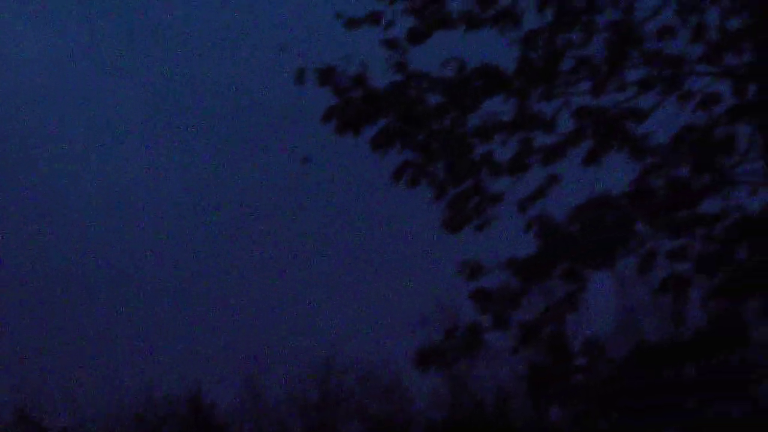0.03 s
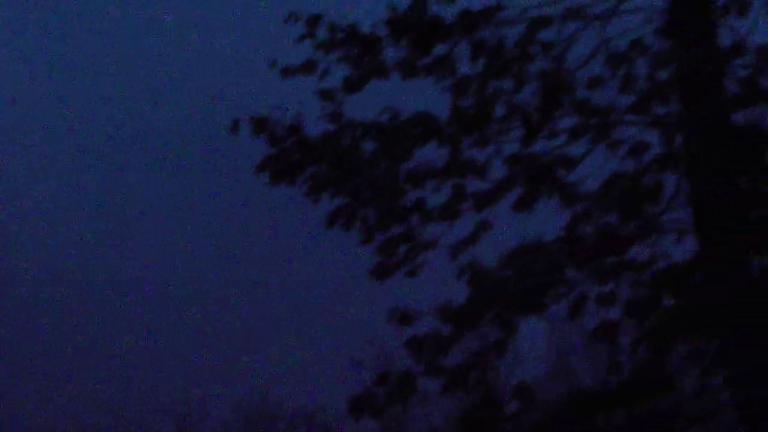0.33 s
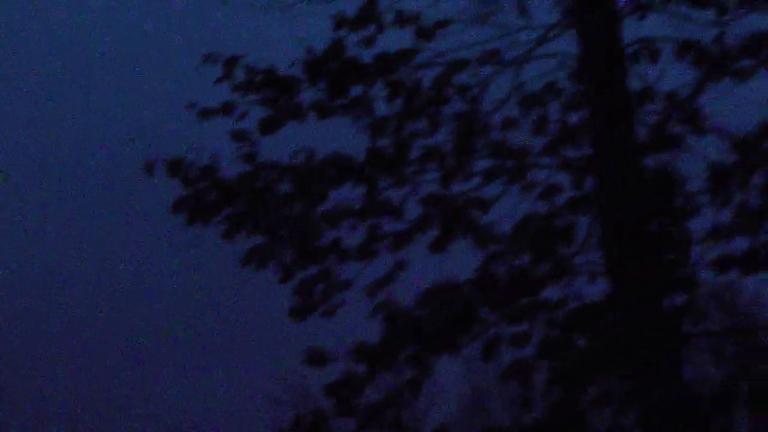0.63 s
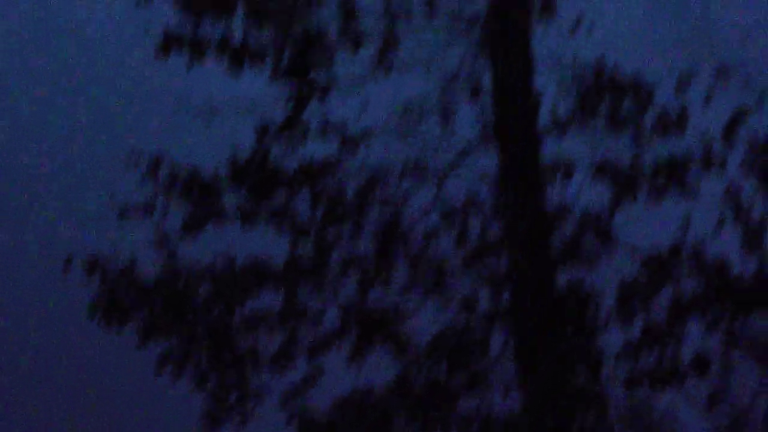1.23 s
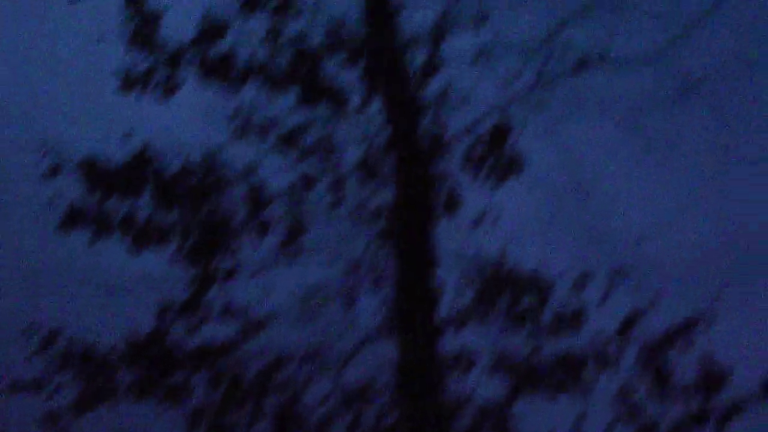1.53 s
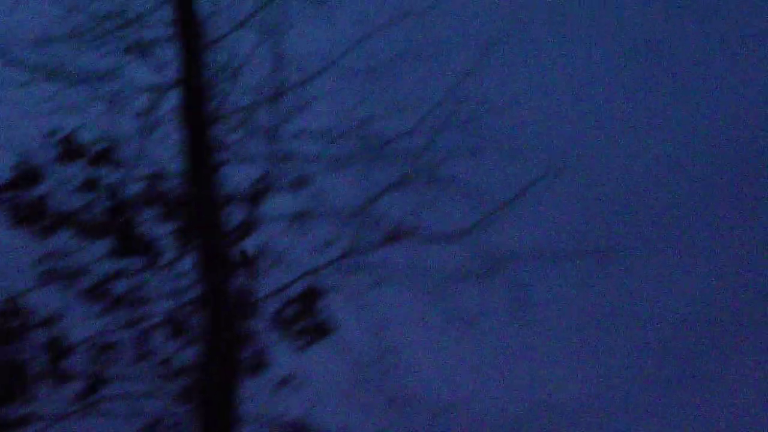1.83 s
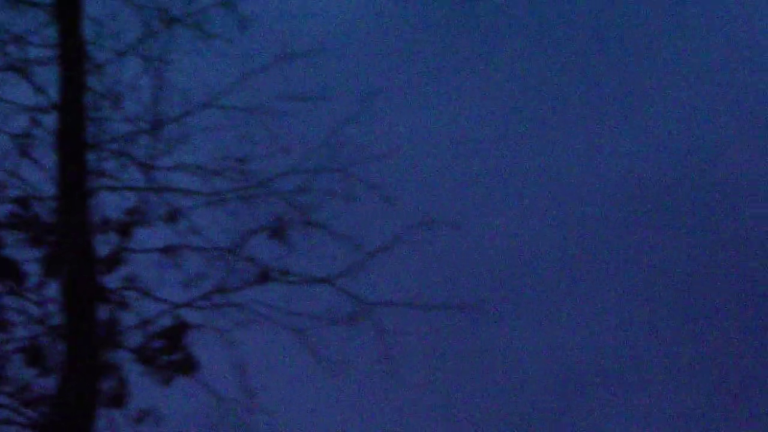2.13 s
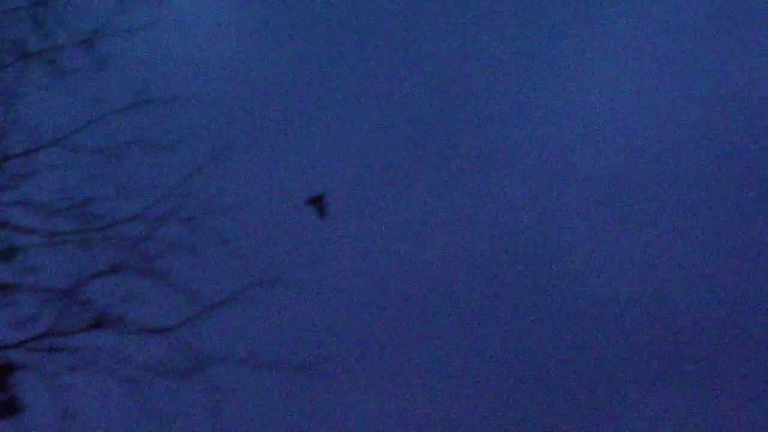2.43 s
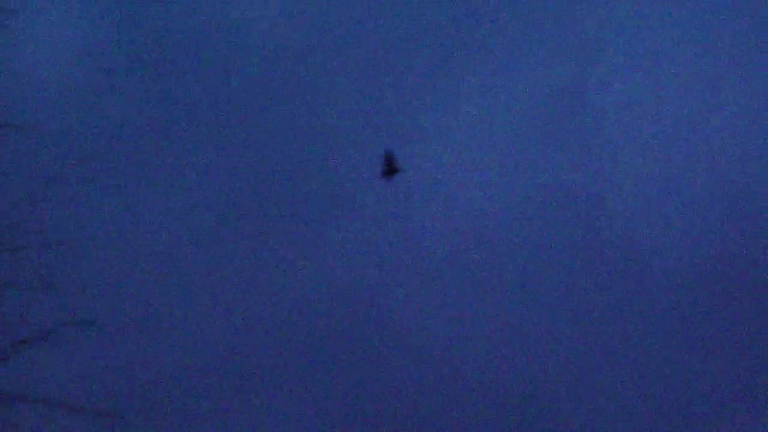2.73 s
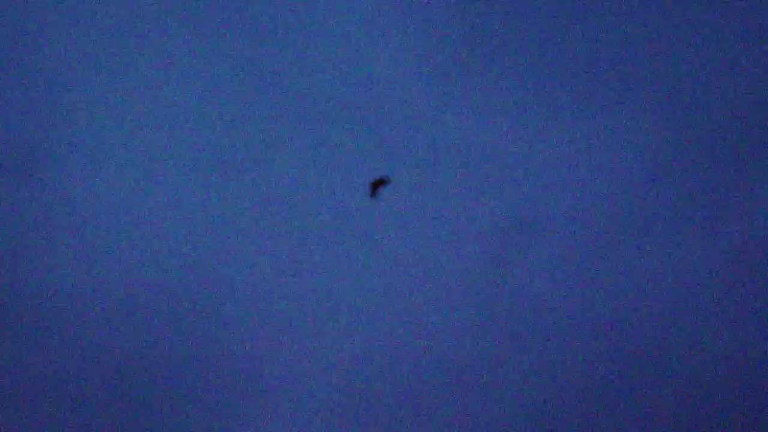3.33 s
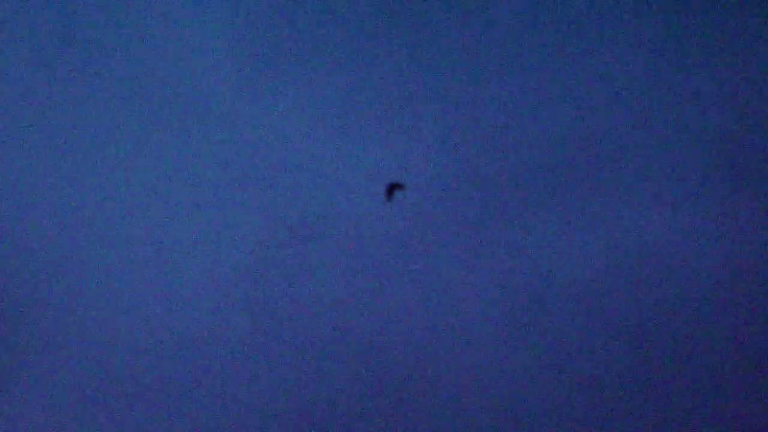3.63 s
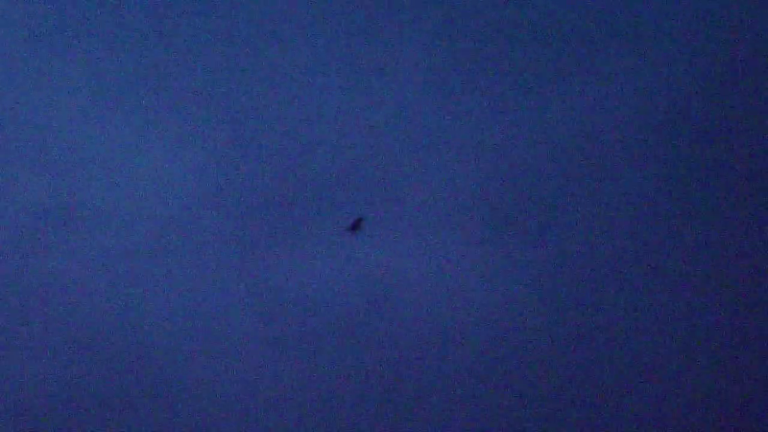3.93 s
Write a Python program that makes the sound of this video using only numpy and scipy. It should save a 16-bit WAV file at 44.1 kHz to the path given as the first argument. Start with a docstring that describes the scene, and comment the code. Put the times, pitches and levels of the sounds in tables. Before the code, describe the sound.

A flying bird gives one thin, high squeak that ends in a snap, a little before halfway. Light wind buffets the hand-held microphone outdoors, with faint hiss, rubbing at first, then soft thumps, knocks and a few clicks.

```python
"""Dusk: light wind buffets the microphone of a hand-held camera, which hisses and whines faintly throughout.
The hand scuffs and rubs on the casing, faint whistles sound far off, and soft knocks and thumps begin.
A woodcock flies over with one thin arched squeak, two voices of its syrinx at once, ending in a snap
and a faint low note that echo in the trees. More knocks and thumps follow, with one more far whistle
and sharp clicks of the casing, and last a brief brush of cloth."""
import sys
import numpy as np
from scipy import signal
from scipy.fft import rfft, irfft, next_fast_len
from scipy.io import wavfile
from scipy.ndimage import map_coordinates

SR = 44100
rng = np.random.default_rng(int(sys.argv[2]) if len(sys.argv) > 2 else 0)


def master_out(mix):
    """Clip the mix to full scale and print it as 16-bit PCM to the path in sys.argv[1]."""
    frames = np.transpose(np.atleast_2d(mix))
    ceiling = np.clip(frames, -1, 1)
    pcm = np.round(ceiling * 32767).astype(np.int16)
    wavfile.write(sys.argv[1], SR, pcm)


N = 176400

# how the casing colours both the hiss and the rubbing: frequency_hz, gain_db
CASING_COLOUR = [(400, -32), (750, -13), (1000, -13), (1150, -7), (1400, -8), (1600, -3), (1900, -4.5),
                 (2170, -11), (2420, -4.5), (2700, -12), (3100, -6.5), (3520, 0.5), (3850, -1),
                 (4280, -9.5), (4620, -3), (5550, -23.5), (6050, -21.5), (6450, -16.5), (7600, -12),
                 (8900, -14), (9450, -9), (10800, -21.5), (11350, -18), (11900, -24), (12700, -29.5),
                 (15700, -29.5)]


def amp(db):
    """Decibels to gain."""
    return 10 ** (np.asarray(db) / 20)


def unit(x):
    """Scaled to rms 1."""
    return x / np.sqrt(np.mean(x ** 2) + 1e-20)


def clock():
    """The time of each sample in seconds."""
    return np.arange(N) / SR


def along(points, hz):
    """Read a curve of (frequency_hz, value) points on a log frequency axis."""
    frequencies, values = np.transpose(points)
    return np.interp(np.log(hz + 1), np.log(frequencies + 1), values)


def wobble(rate):
    """A smooth random curve, rate knots a second."""
    return map_coordinates(rng.standard_normal(int(N * rate / SR) + 4), [clock() * rate])


def filtered(x, response):
    """Equalise x by a gain that depends on frequency."""
    size = next_fast_len(N + SR // 2)
    return irfft(rfft(x, size) * response(np.fft.rfftfreq(size, 1 / SR)), size)[:N]


def passed(x, kind, hz):
    """A low-pass or high-pass, 24 dB an octave."""
    return signal.lfilter(*signal.butter(4, hz, kind, fs=SR), x)


def banded(x, edges_hz):
    """One band of x, at rms 1."""
    return unit(signal.sosfilt(signal.butter(3, edges_hz, "band", fs=SR, output="sos"), x))


def noise(spectrum):
    """Coloured noise of rms 1."""
    return unit(filtered(rng.standard_normal(N), lambda hz: amp(along(spectrum, hz))))


def tone(hz):
    """A sine of rms 1 that follows a pitch curve."""
    return np.sqrt(2) * np.sin(2 * np.pi * np.cumsum(hz) / SR)


def swells(rows):
    """Bell-shaped fades from rows of (peak_s, width_s, level_db)."""
    return sum(amp(db) * np.exp(-.5 * ((clock() - s) / width) ** 2) for s, width, db in rows)


def struck(blows, modes, rise_s, crack_db, crack_t60_s, crack_hz):
    """Each blow rings the modes and adds a short crack of low-passed noise."""
    out = np.zeros(N)
    t = clock()[:SR // 4]
    attack = 1 - np.exp(-t / rise_s)
    for start_s, db in blows:
        ring = sum(amp(gain - 60 * t / t60) * np.sin(2 * np.pi * hz * t) for hz, gain, t60 in modes)
        grit = unit(passed(rng.standard_normal(len(t)), "low", crack_hz))
        crack = amp(crack_db - 60 * t / crack_t60_s) * grit
        part = out[round(start_s * SR):][:len(t)]
        part += (amp(db) * (ring + crack) * attack)[:len(part)]
    return out


def wind():
    """Lumpy buffeting on the microphone over a low bed of air."""
    # the rise and fall of the wind: time_s, strength_db
    gusts = [(0, -37), (.12, -38), (.3, -45), (.55, -49), (.65, -37.5), (.88, -41), (1.08, -29),
             (1.17, -34.5), (1.5, -30.5), (1.75, -35), (2.55, -30), (2.98, -41), (3.12, -29), (3.42, -32),
             (3.62, -28.5), (4, -33)]
    # colour of the buffeting: frequency_hz, gain_db
    rumble = [(10, -3), (25, 3), (80, -8.5), (150, -18), (300, -30), (600, -43.5), (4000, -100)]
    # colour of still evening air: frequency_hz, gain_db
    air = [(30, -2), (350, -11), (600, -14.5), (3000, -79)]
    strength_db = np.interp(clock(), *np.transpose(gusts))
    lumps = amp(3 * wobble(rate=22))
    buffet = unit(lumps * noise(rumble))
    return amp(strength_db + 1.5) * buffet + amp(-55) * noise(air)


def camera():
    """Steady hiss coloured by the casing, with a thin wavering whine from the drive."""
    # the tones of the drive: pitch_hz, level_db
    drive_tones = [(1298, -63), (2807, -65), (3508, -57), (11364, -69)]
    wander_hz, waver_db = 6.84, 0.55
    whine = sum(amp(db) * tone(hz + wander_hz * wobble(40)) for hz, db in drive_tones)
    hiss = amp(-43 + waver_db * wobble(7.97)) * noise(CASING_COLOUR)
    return hiss + whine


def rubbing():
    """The grip scuffs, the sliding hand stirs the casing's lower resonances, and cloth brushes by."""
    # the grip shifts: peak_s, width_s, level_db
    grip_shifts = [(.005, .02, -44), (.13, 0.049, -50.5), (.63, 0.024, -49), (1.405, 0.017, -48),
                   (1.62, 0.052, -54), (1.79, 0.057, -47.5)]
    # the hand slides on the casing: peak_s, width_s, level_db
    strokes = [(.22, 0.058, -49), (.35, 0.04, -46), (.45, 0.038, -47)]
    # the bright colour of cloth: frequency_hz, gain_db
    cloth = [(3000, -27), (8300, 5), (15000, -16)]
    slips = amp(-wobble(rate=82))
    slide = swells(strokes) * banded(slips * noise(CASING_COLOUR), edges_hz=(1120, 2200))
    scuffs = swells(grip_shifts) * banded(rng.standard_normal(N), edges_hz=(167, 417))
    brush = swells([(3.81, 0.011, -44.5)]) * noise(cloth)
    return scuffs + slide + brush


def far_whistles():
    """Faint rough glides that swell and fade, blurred by distance."""
    # far-off whistles: start_s, length_s, from_hz, to_hz, level_db, pitch_scatter_ratio
    whistles = [(0.872, 0.019, 1160, 1120, -46.5, .04), (0.919, 0.098, 1880, 1230, -51, 0.01),
                (0.942, 0.0396, 3370, 3070, -48, .03), (2.806, 0.079, 1080, 1240, -47.5, 0.09)]
    out = np.zeros(N)
    for start_s, length_s, from_hz, to_hz, db, scatter in whistles:
        progress = np.clip((clock() - start_s) / length_s, 0, 1)
        pitch = (from_hz + (to_hz - from_hz) * progress) * (1 + scatter * wobble(500))
        fade = np.sqrt(np.abs(np.sin(np.pi * progress)))
        flutter = amp(3 * wobble(200))
        out += amp(db) * fade * unit(tone(pitch) * flutter)
    return out


def handling():
    """Knocks, dull thumps and sharp clicks of the casing; a softer finger gives a duller knock."""
    # fingers land on the casing: start_s, strength_db, cutoff_hz
    taps = [(.988, -32.5, 890), (1.775, -23.5, 605), (2.08, -25, 346), (2.832, -21.5, 387),
            (2.974, -27.5, 400), (3.099, -27.5, 2500), (3.1017, -39, 2500), (3.578, -29, 1000)]
    # the ring of a knock: pitch_hz, gain_db, t60_s
    knock_modes = [(345, -9.5, 0.05), (634, -2.5, 0.019), (1025, -4.5, 0.019), (1280, 5.5, 0.021),
                   (1460, 5.5, 0.016)]
    # the camera shifts in the hand: start_s, strength_db
    bumps = [(1.045, -18.5), (1.098, -11.5), (1.888, -15.5), (2.072, -15), (2.325, -17.5), (2.5, -14),
             (2.54, -17), (3.108, -21), (3.688, -26)]
    # the low body of a thump: pitch_hz, gain_db, t60_s
    thump_modes = [(47, 0.5, 0.13), (78, -4.5, 0.11), (144, -8, 0.042), (212, -14.5, 0.02)]
    # the casing clicks: start_s, strength_db
    ticks = [(2.28, -26), (3.1068, -21.5), (3.1097, -14)]
    # the bright ring of a click: pitch_hz, gain_db, t60_s
    click_modes = [(2429.5, -10, 0.014), (3550, 13, 0.0038), (4100, -3, 0.004), (5650, -9, .005),
                   (8900, -5, 0.0033)]
    clicks = struck(ticks, click_modes, rise_s=0.00076, crack_db=-5, crack_t60_s=0.0084, crack_hz=5370)
    knocks = np.zeros(N)
    for start_s, db, cutoff_hz in taps:
        knock = struck([(start_s, db)], knock_modes,
                       rise_s=0.00075, crack_db=-8, crack_t60_s=0.014, crack_hz=2500)
        knocks += passed(knock, "low", cutoff_hz)
    thumps = struck(bumps, thump_modes, rise_s=0.0047, crack_db=-17, crack_t60_s=0.039, crack_hz=235)
    return knocks + thumps + clicks


def voice(contour, partials):
    """One side of the syrinx: a slightly unsteady whistle that follows a pitch and level contour."""
    # an overtone against the fundamental, by where it falls: frequency_hz, gain_db
    colour = [(3000, -25), (7000, -18), (8400, -9.5), (9500, -11.5), (11000, -23), (13500, -25),
              (15500, -19)]
    jitter, shimmer_db, fade_s = 0.0059, 2.5, 0.0016
    times, hz, db = np.transpose(contour)
    t = clock()
    pitch = np.interp(t, times, hz) * (1 + jitter * wobble(600))
    gate = np.clip(np.minimum(t - times[0], times[-1] - t) / fade_s + 1, 0, 1)
    level = amp(np.interp(t, times, db) + shimmer_db * wobble(400))
    overtones = sum(amp(along(colour, k * pitch)) * (k * pitch < SR / 2) * tone(k * pitch)
                    for k in range(2, partials + 1))
    return gate * level * (tone(pitch) + overtones)


def woodcock():
    """Two voices arch together, the call snaps shut and a low note trails; the trees answer faintly."""
    # the main arch of the squeak: time_s, pitch_hz, level_db
    squeak = [(1.486, 3490, -45.5), (1.493, 4210, -36), (1.499, 4700, -31), (1.508, 5320, -39.5),
              (1.512, 6100, -44.5), (1.522, 6450, -41.5), (1.535, 6660, -36.5), (1.546, 6500, -41.5),
              (1.553, 5940, -43.5), (1.557, 4800, -39), (1.561, 4040, -44), (1.564, 3720, -46)]
    # the second voice of the syrinx: time_s, pitch_hz, level_db
    upper_voice = [(1.516, 6800, -51), (1.523, 7500, -44), (1.53, 7961, -42), (1.54, 7500, -46),
                   (1.549, 7100, -45)]
    # the snaps that close the call: start_s, strength_db
    snaps = [(1.5658, -29.5), (1.5682, -27.5)]
    # the ring of a snap: pitch_hz, gain_db, t60_s
    snap_modes = [(900, -15, 0.028), (1136, -6, 0.039), (1362, -5, 0.043), (1775, -11.5, .06),
                  (2880, -4, 0.019), (3370, -1, 0.012), (3800, -1.5, 0.021)]
    # a low note that rises and dies after the snap: time_s, pitch_hz, level_db
    afternote = [(1.57, 1118, -42), (1.582, 1166, -45), (1.61, 1250, -49)]
    echo_db, echo_t60_s = -17, 0.3
    call = voice(squeak, partials=3) + voice(upper_voice, partials=1) + voice(afternote, partials=1)
    snap = struck(snaps, snap_modes, rise_s=0.00026, crack_db=-5, crack_t60_s=0.03, crack_hz=3770)
    call += passed(snap, "high", hz=900)
    t = clock()[:SR // 2]
    tail = rng.standard_normal(len(t)) * amp(-60 * t / echo_t60_s)
    echo = signal.fftconvolve(call, tail / np.linalg.norm(tail))[:N]
    return call + amp(echo_db) * echo


def scene():
    """The bird and the far whistles, mixed in mono with the hand, wind and camera noise."""
    return (woodcock() + far_whistles() + handling() + rubbing() + wind() + camera())[None]


def record(dry):
    """The camera keeps nothing above its band limit."""
    return filtered(dry[0], lambda hz: hz < 15750)[None]


dry = scene()
out = record(dry)
master_out(out)
```